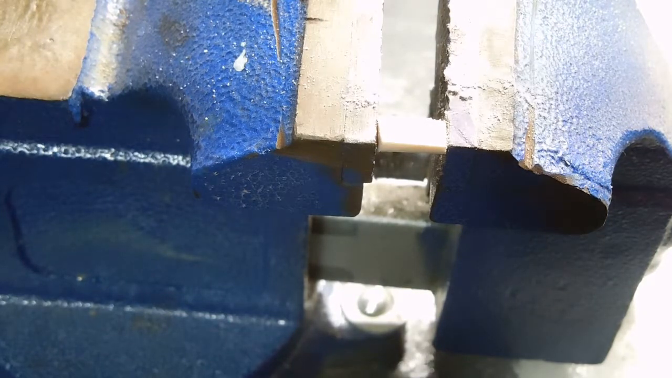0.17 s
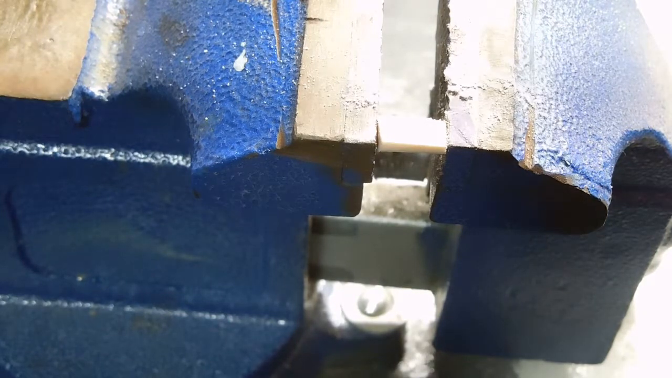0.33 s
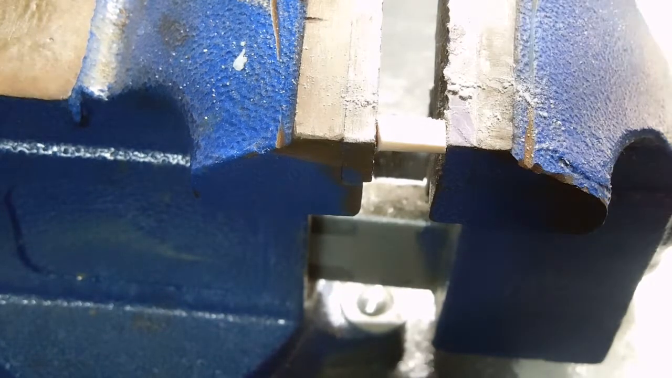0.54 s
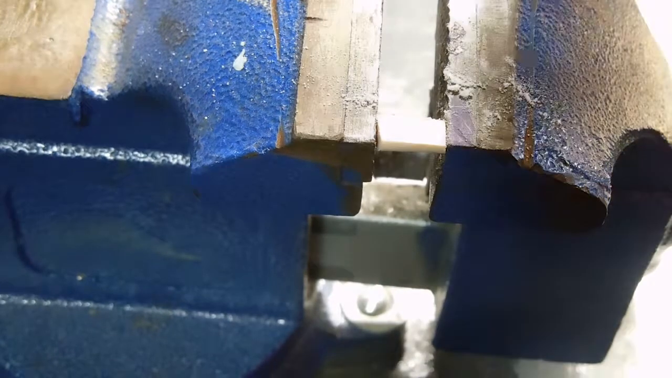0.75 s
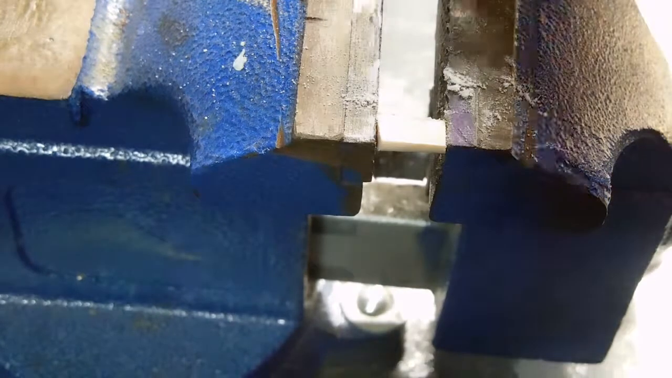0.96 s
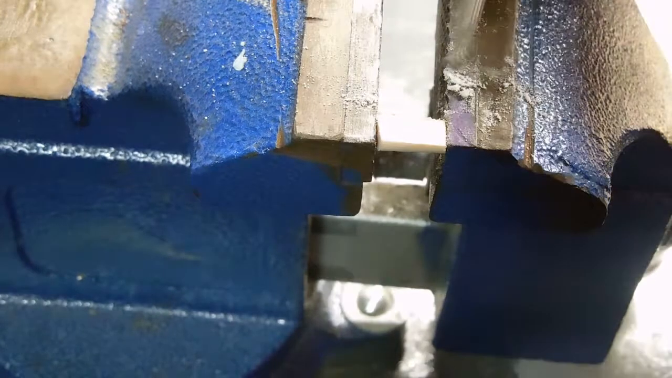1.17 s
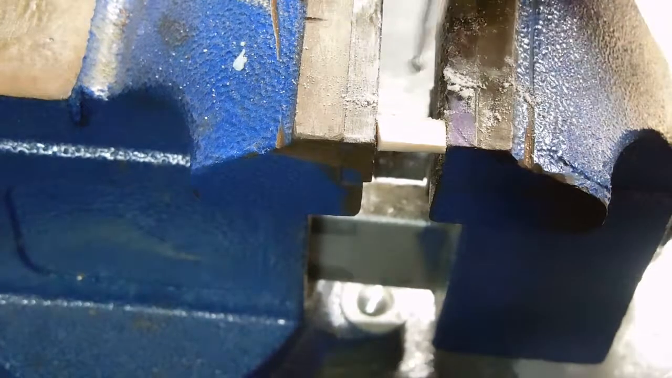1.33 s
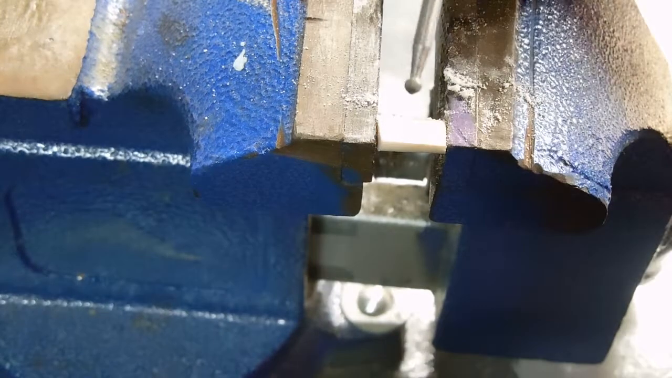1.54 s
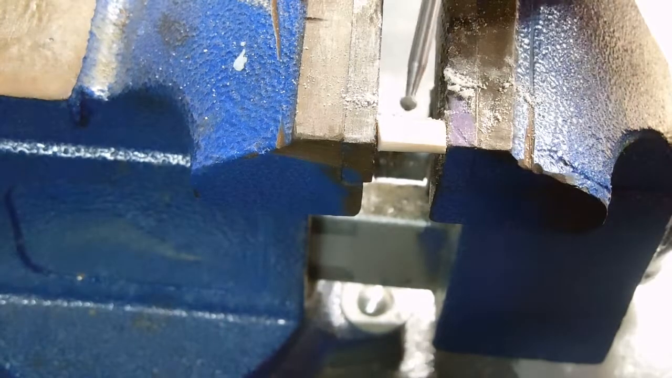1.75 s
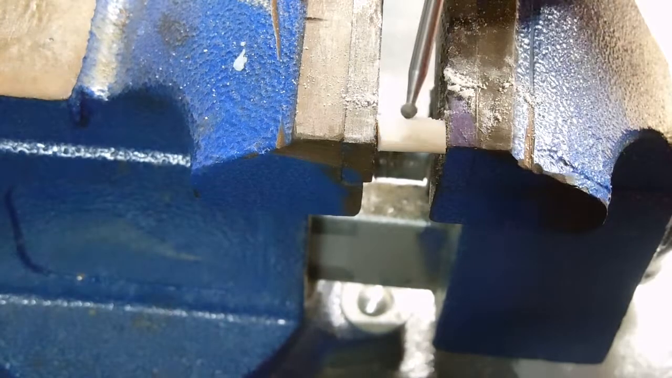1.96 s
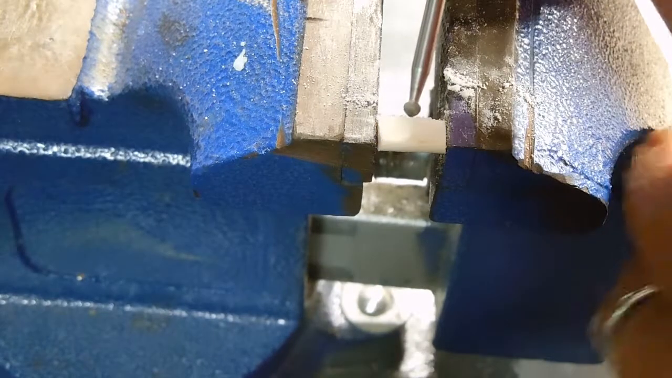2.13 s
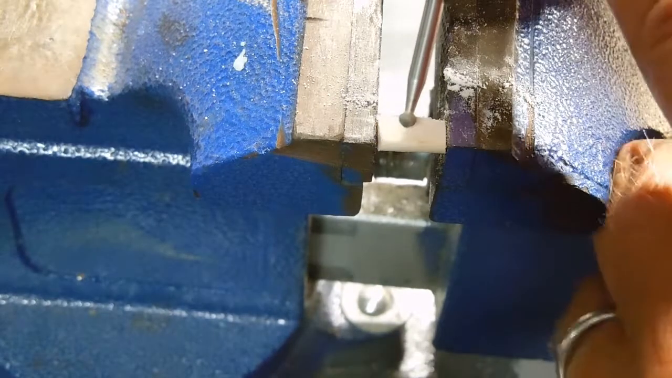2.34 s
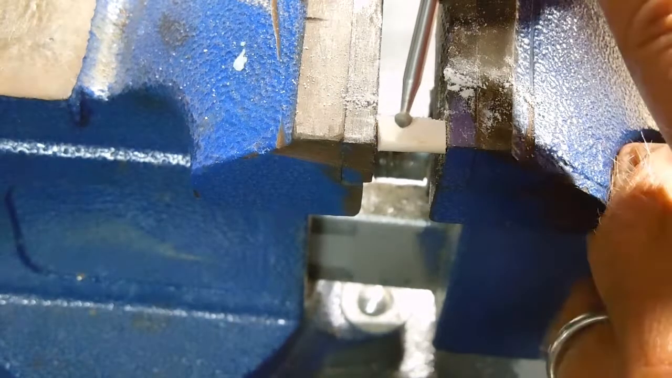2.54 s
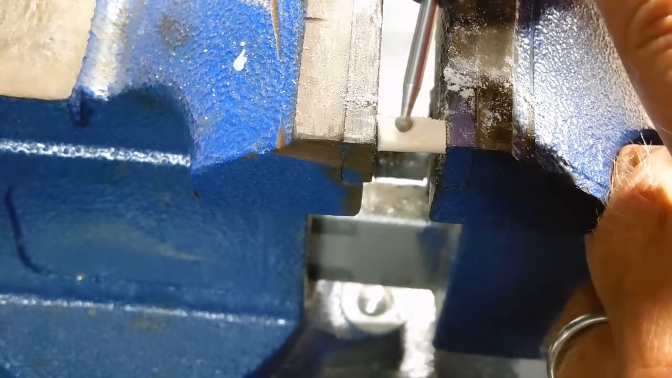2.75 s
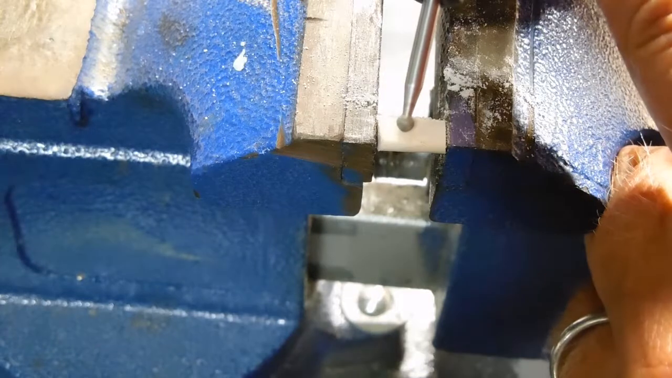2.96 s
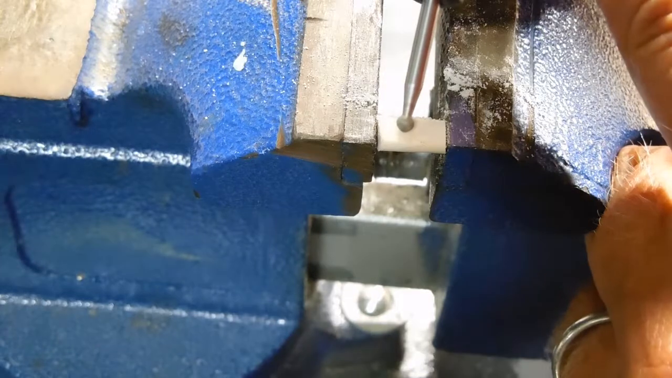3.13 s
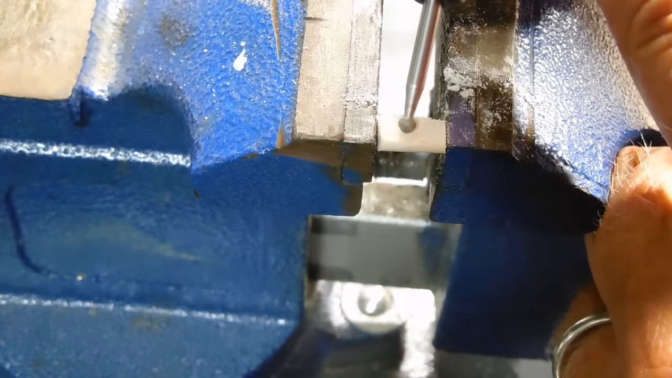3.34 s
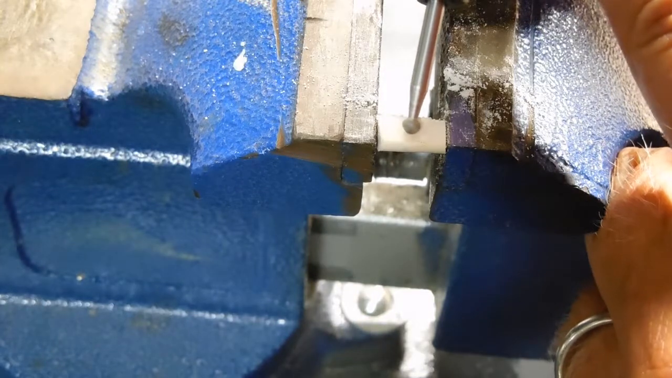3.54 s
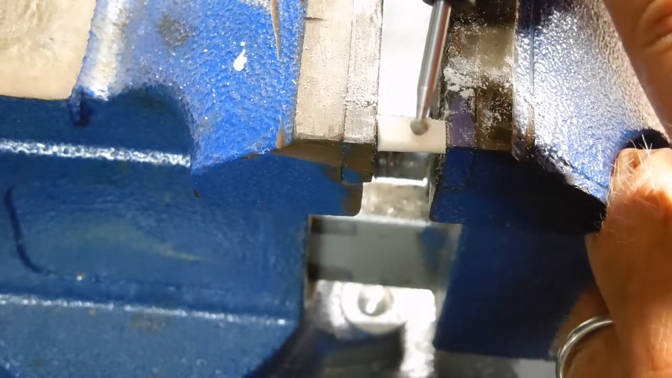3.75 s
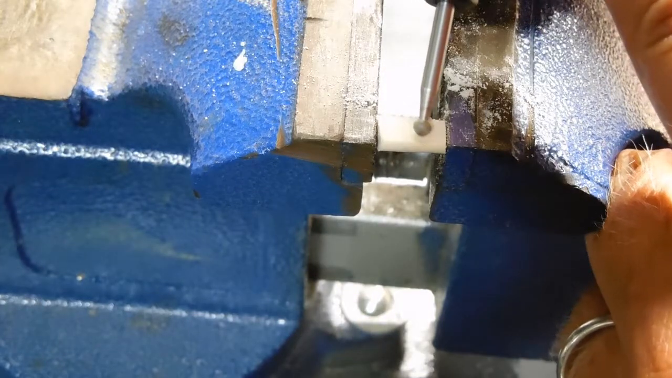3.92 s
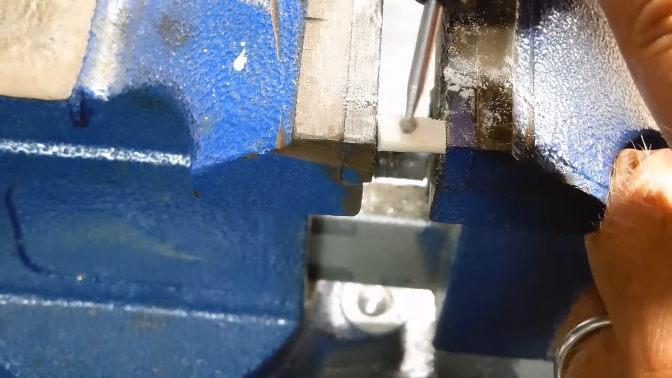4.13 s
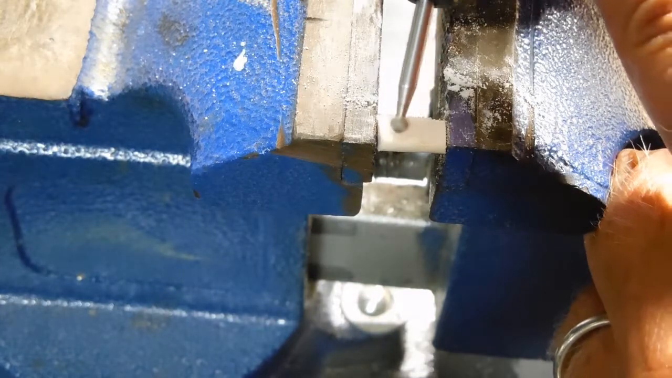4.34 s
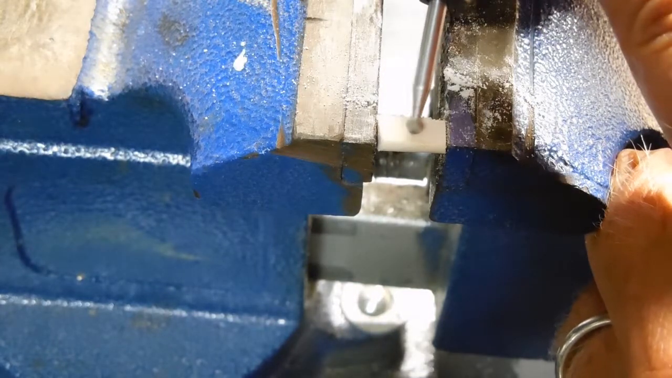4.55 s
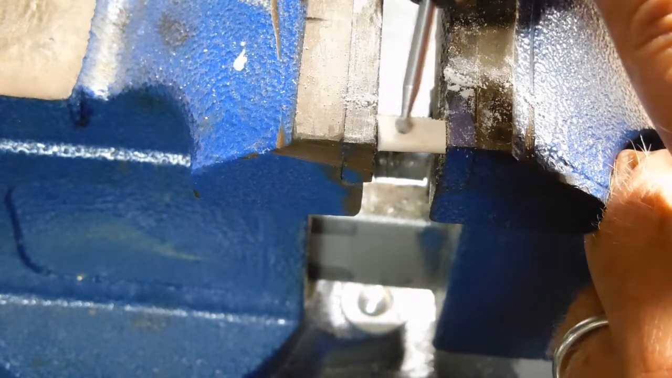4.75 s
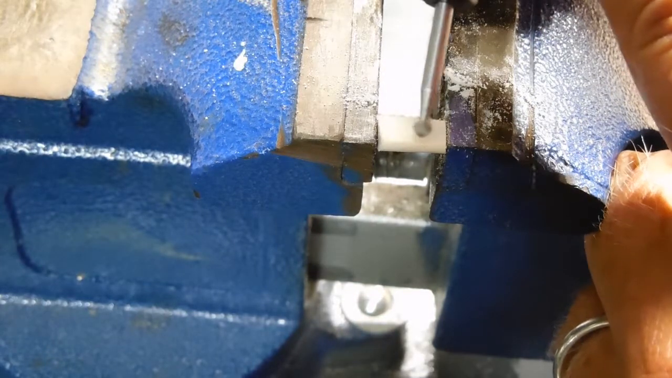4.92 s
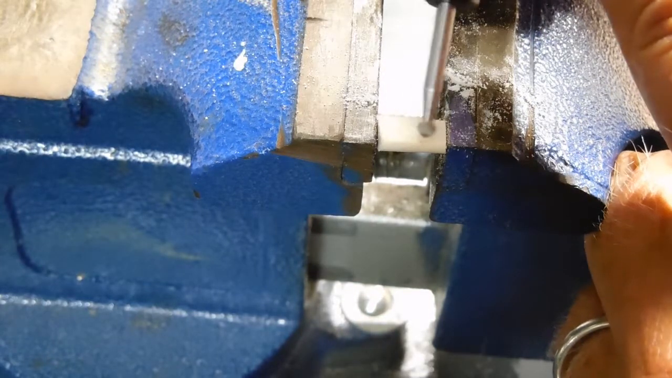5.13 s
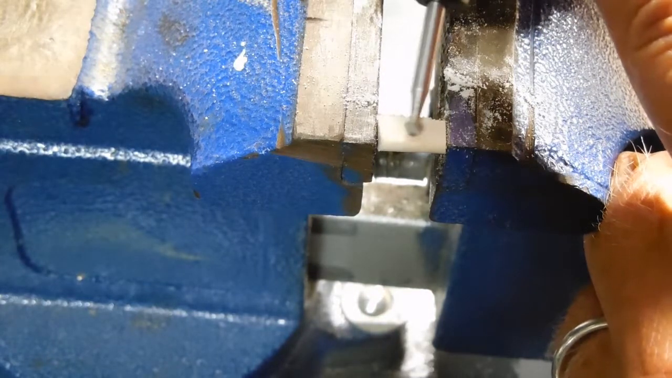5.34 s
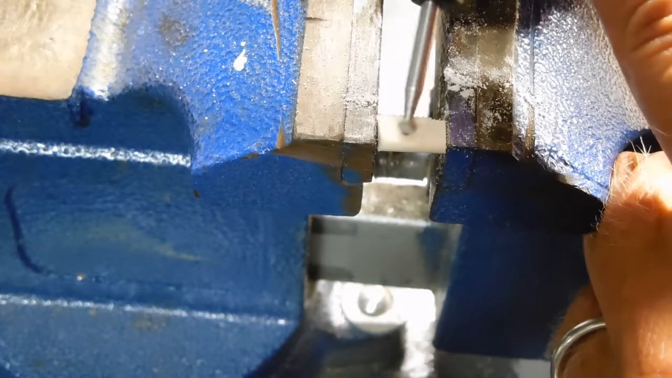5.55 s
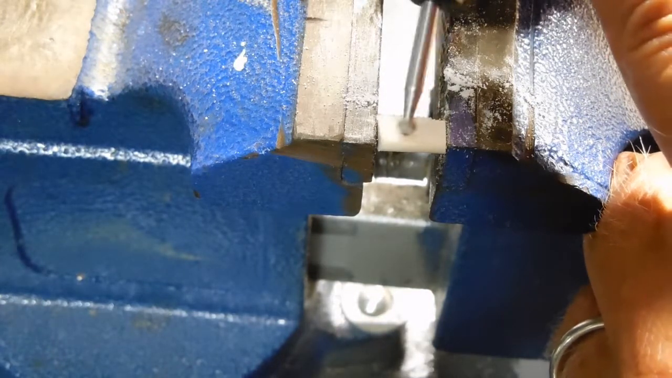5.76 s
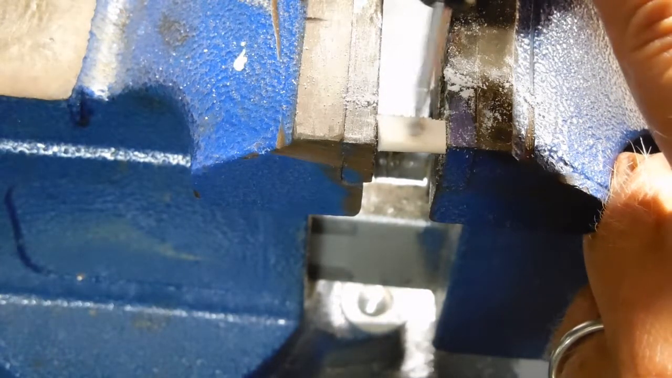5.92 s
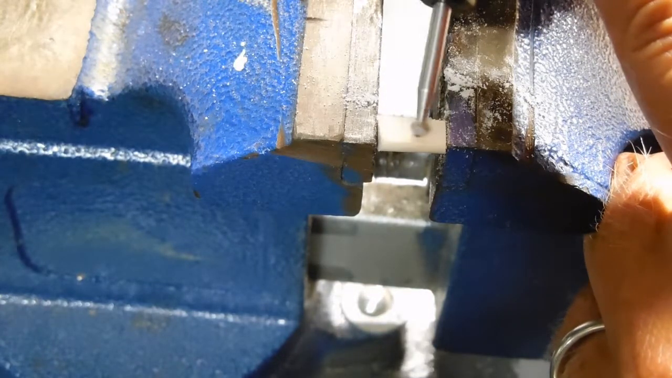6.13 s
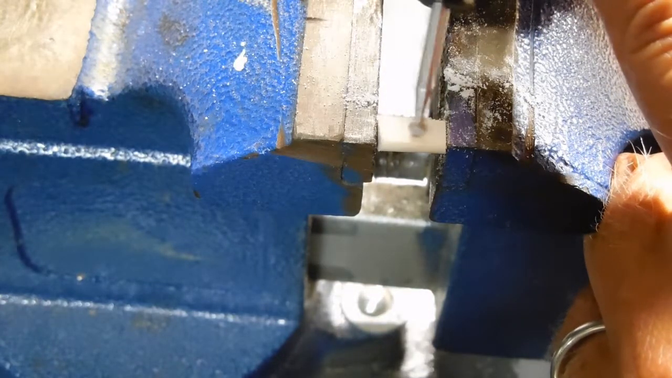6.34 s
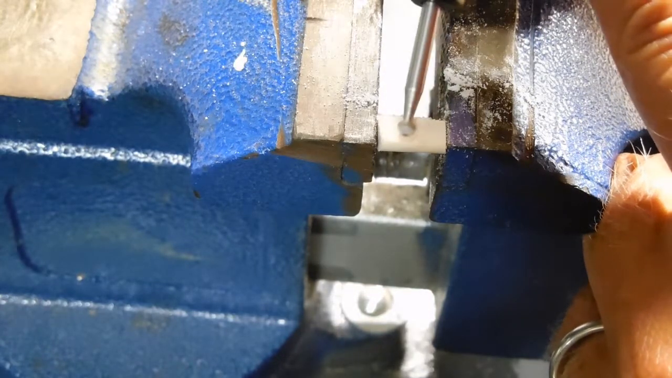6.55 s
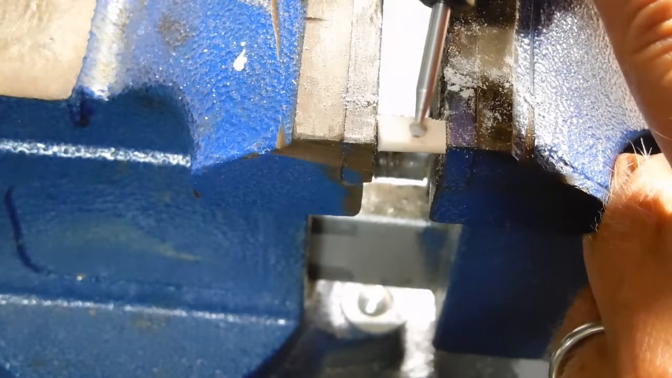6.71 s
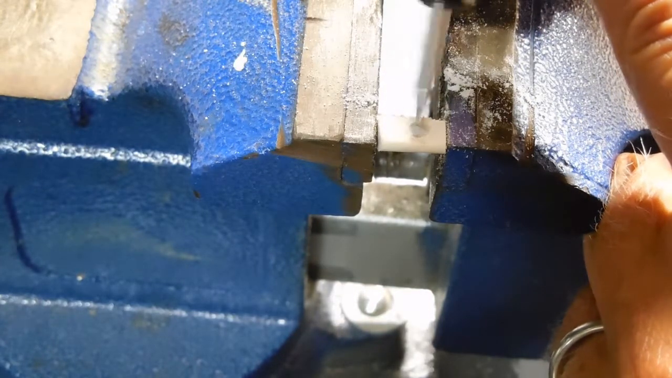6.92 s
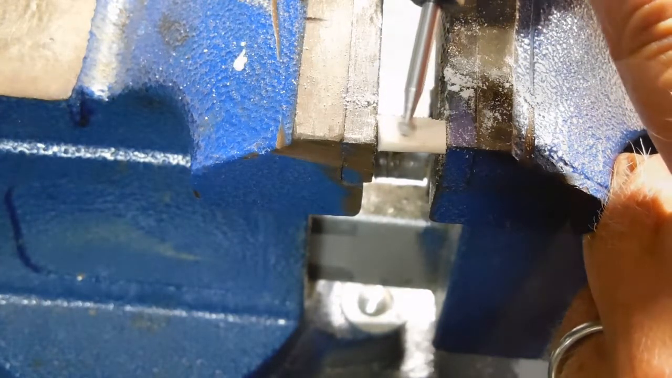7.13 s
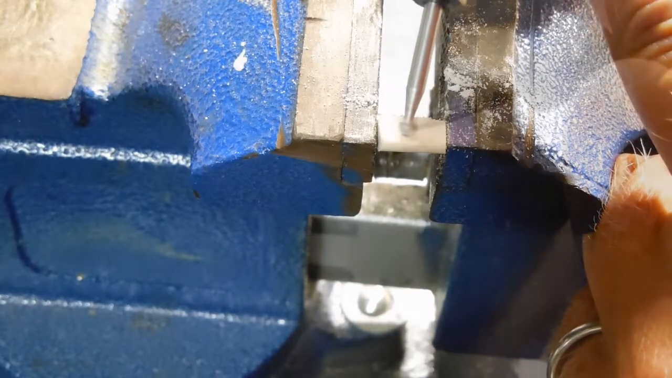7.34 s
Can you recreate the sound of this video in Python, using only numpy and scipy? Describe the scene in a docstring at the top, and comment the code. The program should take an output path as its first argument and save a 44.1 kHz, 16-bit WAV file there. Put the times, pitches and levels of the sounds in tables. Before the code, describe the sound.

Close up in a workshop, a small rotary tool is already turning and climbs in pitch, its airy hiss joined by a quick metallic rattle. A piercing motor whine settles, then the burr touches wood with a light dry buzz. The cut grows rougher and louder in uneven pushes, speed sagging slightly, thin high whistles wavering on top. It is still cutting at the end.

```python
"""Rotary burr carving wood

A handheld rotary tool spins up, then its burr carves a small block of wood held in a vise. Brushes crossing
commutator bars sing on multiples of 16 shaft orders, over turbulent hiss coloured by resonances of the housing.
The off-centre burr knocks the wood once a turn, scrapes in puffs and drags the speed down; a loose collet rattles
during spin-up and housing whistles join the cut. A low murmur and hums sink early, then flutter faintly until
the cut, which brings short bursts of faint low noise."""
import sys
import numpy as np
from scipy import signal
from scipy.io import wavfile
from scipy.ndimage import uniform_filter1d, minimum_filter1d

SR = 44100
rng = np.random.default_rng(int(sys.argv[2]) if len(sys.argv) > 2 else 0)


def master(y):
    """Save y as 16-bit WAV."""
    cut = np.clip(np.atleast_2d(y).T, -1, 1)
    pcm = np.round(cut * 32767)  # scale
    wavfile.write(sys.argv[1], SR, pcm.astype(np.int16))


N = 325458
T = np.arange(N) / SR  # seconds
HZ = np.fft.rfftfreq(1024, 1 / SR)  # bins of the noise spectra
FRAMES = np.arange(N // 256 + 5) * 256 / SR  # seconds
TOUCH_S, LANDING_S = 2.81, 0.08  # the burr meets the wood; time to land
SINK_S, SINK_TIME_S = 0.41, 0.15  # murmur and hums sink: start, duration


def gain_of(db):
    """Logarithmic level: decibels to an amplitude factor."""
    return np.exp(np.asarray(db, np.float32) * np.float32(np.log(10) / 20))


def evened(x):
    """Power normalisation: scales to rms 1."""
    return x / np.sqrt(np.mean(x ** 2) + 1e-20)


def columns(table, t):
    """Linear interpolation: the columns of a curve table at times t."""
    s, *rest = np.transpose(table)
    return [np.interp(t, s, c) for c in rest]


def on_hz(table, hz):
    """Logarithmic frequency: the columns of a spectrum table interpolated along it."""
    f, *rest = np.transpose(table)
    return [np.interp(np.log(hz + 1), np.log(f + 1), c) for c in rest]


def drift(hz):
    """Low-pass filtered noise: a random wander of rms 1, with changes up to hz."""
    points = rng.standard_normal(int(N / SR * 200) + 2)
    smooth = signal.lfilter(*signal.butter(2, min(hz / 100, .99)), points)
    return np.interp(T, np.arange(len(points)) / 200, evened(smooth))


# How the burr sits in the hollow. Each row: time in seconds, seat (0 tip touching, 1 flank cutting, 2 deep).
SEAT = [(2.78, 0), (4.12, 0), (4.18, 1), (5.76, 1), (5.86, 2), (7.38, 2)]


def by_seat(values):
    """Contact geometry: blends three values as the burr goes from tip to flank to deep."""
    s, seat = np.transpose(SEAT)
    return np.interp(T, s, np.take(values, seat.astype(int)))


def sinking(from_value, to_value):
    """Linear transition: a value that holds, then moves to another while the murmur and hums sink."""
    return from_value + (to_value - from_value) * np.clip((T - SINK_S) / SINK_TIME_S, 0, 1)


# Likeness of left and right. Each row: frequency in Hz, coherence (0 to 1), lead of the right side in radians.
PORTS = [(60, 0.93, .01), (150, 1, .01), (302, 0.96, .02), (1000, 0.69, 0.056), (2030, 0.72, 0.39),
         (2800, 0.71, 1), (3640, 0.97, 0.14), (4070, 0.37, 1), (5400, 0.55, 0.31), (6840, 0.1, 0.67),
         (6900, 0.26, 0.51), (8400, 0.89, 0.55), (9300, 0.35, 0.16), (13800, 0.34, .2)]
# Stereo balance of the hiss. Each row: frequency in Hz, left minus right in dB.
PAN = [(60, 1), (150, -2), (370, 1.5), (920, -2.5), (2290, -1.5), (5680, -2), (14100, 3)]


def hiss(field_db, patchy_db):
    """Partial coherence: stereo noise of rms 1, its bins x frames shaped by field_db, in drifting patches."""
    a, b, c, d, patches = rng.standard_normal((len(FRAMES), len(HZ), 5), dtype=np.float32).T
    patches = uniform_filter1d(patches, size=10, axis=0)
    patches = evened(uniform_filter1d(patches, size=12, axis=1))
    shape = gain_of(field_db + 0 * patches)
    shape = shape / np.sqrt((shape ** 2).mean(0))  # equal power in every frame before the patches
    shape = shape * gain_of(patchy_db * patches)
    coherence, lead = on_hz(PORTS, HZ)
    coherence = np.clip(coherence, 0, 1)[:, None]
    pan = gain_of(on_hz(PAN, HZ)[0] / 2)[:, None]
    left = a + 1j * b
    right = coherence * left + np.sqrt(1 - coherence ** 2) * (c + 1j * d)
    right = right * np.exp(1j * lead)[:, None]
    spectrum = np.array([left * pan, right / pan]) * shape
    return evened(signal.istft(spectrum, nperseg=1024, noverlap=768)[1][:, :N])


def line(angle, lead, pan_db):
    """Interaural phase and level: one tone of rms 1 before panning, the right side leading by lead radians."""
    wrapped = (angle - 2 * np.pi * np.rint(angle / (2 * np.pi))).astype(np.float32)
    left, right = np.cos(wrapped), np.cos(wrapped + np.float32(lead))
    return np.float32(np.sqrt(2)) * np.array([gain_of(pan_db / 2) * left, gain_of(-pan_db / 2) * right])


# Levels of the hums and murmur after they sink. Each row: time in seconds, level of the hums in dB,
# level of the murmur in dB; both before their flutter.
SUNK = [(0.6, -75, -86), (0.68, -64, -82), (1.03, -92, -96), (1.08, -71, -88), (1.26, -75, -90),
        (1.29, -95, -107), (1.51, -66, -86), (1.63, -100, -110), (1.81, -88, -91), (1.86, -96, -110),
        (1.9, -83, -83), (2.11, -102, -110), (2.24, -72, -109), (2.27, -70, -89), (2.66, -76, -92),
        (2.8, -74, -110)]
# Hums of the workshop. Each row: centre in Hz, half-power width in Hz, relative power density in dB.
ROOM_HUMS = [(330, 190, -16), (583.3, 32.4, 7), (646, 27, -23), (746, 45, -7), (980, 240, -6.5),
             (1130, 280, -5.5)]
ROOM_DB = -51  # before sinking


def room():
    """Narrow-band noise: fuzzy workshop hums that sink early, then flutter faintly."""
    power = sum(gain_of(2 * db) / (1 + ((HZ - hz) / (width / 2)) ** 4) for hz, width, db in ROOM_HUMS)
    flutter_db = sinking(2, 4) * np.tanh(drift(6))
    level_db = sinking(ROOM_DB, columns(SUNK, T)[0])
    fade = np.clip((TOUCH_S - T) / LANDING_S, 0, 1)  # the hums fade out as the burr lands
    hums = hiss(10 * np.log10(power)[:, None], patchy_db=-1.0)
    return fade * gain_of(level_db + flutter_db) * hums


# Colour of the low noise. Each row: frequency in Hz, relative level in dB per Hz.
RUMBLE_COLOUR = [(20, -44), (60, 9.5), (150, -18), (250, -1), (400, -1.5), (520, 5), (700, -25)]
# Short bursts of faint low noise during the cut. Each row: start in seconds, length in seconds, level in dB.
LOW_BURSTS = [(3.28, 0.13, -76), (3.458, 0.056, -73), (3.63, 0.081, -68), (4.271, 0.04, -80),
              (4.383, 0.14, -71), (4.615, 0.066, -76), (4.716, 0.053, -77), (4.804, 0.081, -69),
              (5.018, 0.073, -72), (5.292, 0.063, -69), (5.375, 0.15, -72), (5.676, 0.246, -67),
              (6.092, 0.2, -61.5), (6.284, 0.16, -63), (6.42, 0.1, -68), (6.55, 0.1, -64),
              (6.797, 0.05, -70), (6.895, 0.061, -66), (7.008, 0.093, -63.5), (7.108, 0.06, -60),
              (7.23, 0.07, -65), (7.323, 0.06, -69)]
MURMUR_DB = -61.5  # before sinking
BURST_EDGE_S, LOW_FLOOR_DB = 0.01, (-86, -79, -75)  # low noise between bursts: tip, flank, deep


def rumble():
    """Amplitude-modulated low noise: a murmur that sinks and flutters, then low bursts."""
    sunk = np.clip((T - SINK_S) / SINK_TIME_S, 0, 1)
    level = gain_of(sinking(MURMUR_DB, columns(SUNK, T)[1]) + 5 * sunk * np.tanh(drift(2.9)))
    low_floor = gain_of(by_seat(LOW_FLOOR_DB) + 2.9 * np.tanh(drift(11.0)))
    level = level + np.clip((T - TOUCH_S) / 0.36, 0, 1) * low_floor
    for s, length, db in LOW_BURSTS:
        corners_s = s + np.array([-BURST_EDGE_S, 0, length - BURST_EDGE_S, length])
        level = level + np.interp(T, corners_s, gain_of(db) * np.array([0, 1, 1, 0]))
    lumps = gain_of(sinking(1.5, 3.5) * drift(7.3))
    low_noise = hiss(on_hz(RUMBLE_COLOUR, HZ)[0][:, None], patchy_db=4.5)
    return level * evened(lumps * low_noise)


# The loose collet rattles as the shaft passes through its resonance.
# Each row: start in seconds, level in dB before a common trim, pitch in Hz.
RATTLES = [(0.3117, -22, 3760), (0.3242, -19, 4530), (0.3284, -23, 3800), (0.3465, -23, 3780),
           (0.3634, -20, 4660), (0.377, -16.5, 3850), (0.3894, -23, 3670), (0.4154, -26, 4050),
           (0.4325, -22, 3900), (0.4444, -30, 4000), (0.4707, -22, 3940), (0.4804, -20, 3820),
           (0.487, -26, 3740), (0.4994, -26, 4200), (0.5144, -21, 3860), (0.5521, -22, 4160),
           (0.561, -21, 5400), (0.5846, -24, 5170)]
RATTLE_RISE_S, RATTLE_T60_S, RATTLE_TRIM_DB = .0008, 0.005, -4.5


def rattle():
    """Damped free vibration: short ticks ringing in the nose of the tool."""
    out, t = np.zeros((2, N)), np.arange(1500) / SR
    decay = gain_of(-60 * np.maximum(t - RATTLE_RISE_S, 0) / RATTLE_T60_S)
    shape = np.minimum(t / RATTLE_RISE_S, 1) * decay
    phases = rng.uniform(0, 2 * np.pi, len(RATTLES))
    for (s, db, hz), phase in zip(RATTLES, phases):
        at = round(s * SR)
        ring = line(2 * np.pi * hz * t + phase, 0.41, -1.2)
        out[:, at:at + len(t)] += gain_of(db + RATTLE_TRIM_DB) * shape * ring
    return out


# Two narrow resonances of the housing whistle as the cut deepens. Each row: time in seconds,
# level of the lower in dB, level of the upper in dB; both before their share and the seat of the burr.
WHISTLES = [(4.0, -44, -39), (4.03, -49, -37), (4.18, -42, -35), (4.24, -44, -41), (4.31, -31, -37),
            (4.34, -47, -37), (4.39, -43, -42), (4.44, -56, -37), (4.5, -43, -36), (4.7, -47, -37),
            (4.72, -44, -42), (4.82, -39, -39), (5.19, -45, -34), (5.35, -34, -26), (5.95, -45, -32),
            (6.25, -45, -25), (6.3, -55, -34), (6.36, -35, -33), (6.51, -41, -42), (6.57, -37, -28),
            (6.69, -36, -22), (6.77, -48, -30), (6.81, -41, -46), (6.88, -46, -31), (7.11, -39, -27),
            (7.38, -44, -27)]
WHISTLE_HZ, WHISTLE_WAVER_HZ, WHISTLE_SHARE_DB = (6120, 8470), (39.8, 70.6), (0.5, -4.5)  # lower, upper


def whistles():
    """Random frequency modulation: fuzzy, wavering tones that come up once the flank cuts."""
    out = np.zeros((2, N))
    levels_db = columns(WHISTLES, T)
    for hz, waver_hz, share_db, db in zip(WHISTLE_HZ, WHISTLE_WAVER_HZ, WHISTLE_SHARE_DB, levels_db):
        pitch_hz = hz + waver_hz * (drift(12) + .6 * drift(90))
        turn = 2 * np.pi * np.cumsum(pitch_hz) / SR
        out += gain_of(db + share_db + 2.3 * drift(60)) * line(turn, on_hz(PORTS, hz)[1], -0.6)
    return columns(SEAT, T)[0] / 2 * out


# The shaft spins up, then sags as the cut deepens. Each row: time in seconds, mean shaft speed in Hz.
SPEED = [(0.0, 105.06), (0.12, 111.6), (0.225, 117.8), (0.3, 121.8), (0.4, 126.7), (0.475, 129.7),
         (0.6, 134.19), (0.85, 140.86), (1.1, 145.81), (1.35, 149.44), (1.475, 150.4), (1.725, 151.4),
         (1.85, 152.5), (2.1, 154.1), (2.85, 155.35), (3.35, 154.5), (3.6, 155.0), (3.975, 154.2),
         (4.2, 154.1), (4.475, 153.55), (4.85, 152.3), (5.1, 150.6), (5.35, 151.05), (5.6, 151.05),
         (5.85, 150.3), (6.1, 148.62), (6.35, 147.6), (6.79, 147.0), (6.975, 146.2), (7.38, 147.3)]
# Whirr of fan and brushes. Each row: time in seconds, level in dB before flicker and throb,
# lift of the hiss below about 4400 Hz in dB.
WHIRR = [(0, -33, 4), (.2, -32.5, 4.5), (.33, -29.5, 5), (.7, -30.5, 2), (.78, -27.5, -1),
         (1.13, -27.5, 0.5), (1.52, -25.5, -1.5), (1.66, -26.5, 0), (1.8, -25, -1.5), (2.3, -27.5, 1),
         (3.0, -26.5, 1), (4.05, -26.5, 3.5), (4.3, -25.5, 3.5), (5.3, -25.5, 3), (6.05, -25, 2.5),
         (6.65, -25, -0.5), (6.9, -24.5, 3.5), (7.2, -23.5, -2), (7.38, -23.5, 2)]
# Colour of the whirr under its humps. Each row: frequency in Hz, relative level in dB per Hz.
WHIRR_BASE = [(300, -59), (600, -48.5), (950, -30), (1150, -21), (1500, -12.5), (2500, -6.5), (5500, -6),
              (7500, 0), (9500, -1.5), (10300, -8), (12200, -18.5), (12600, -41), (13300, -20),
              (13800, -45), (14500, -40)]
# Humps at full speed. Each row: centre in Hz, width in Hz, height in dB running free, height in dB cutting deep.
HUMPS = [(2390, 450, 3.5, 8), (3480, 710, 5, 6), (4720, 1100, 4, 5.5), (6185, 320, 6, 7.5),
         (7550, 600, 2.5, 7.5), (8530, 480, 7.5, 11.5), (9950, 600, 3.5, 5.5), (11080, 370, 2, 7),
         (12130, 400, 3, 6)]
# Bands swell or sink as the tool is turned in the hand. Each row: centre in seconds, length in seconds,
# centre in Hz, width in Hz, height in dB.
SWELLS = [(0.62, 0.3, 4100, 750, 2), (0.29, 0.84, 4820, 1300, 5), (0.58, 0.14, 5800, 2000, 7),
          (0.7, 0.73, 3150, 1230, -5.5), (0.87, 0.34, 5400, 690, 6), (0.99, 0.5, 1650, 890, 6.5),
          (0.39, 0.5, 3800, 300, 7.5), (1.16, 0.23, 7400, 1000, 5.5), (1.26, 0.3, 3500, 350, 7),
          (0.2, .2, 4550, 120, 10), (.3, 0.18, 2800, 140, 12)]
HUMP_SPEED_HZ = 155.8  # shaft speed at which the humps have climbed into place


def whirr(angle):
    """Resonance-coloured turbulence: air and brush hiss throbbing twice a turn, and once a turn under load."""
    level_db = columns(WHIRR, T)[0]
    low_db = columns(WHIRR, FRAMES)[1] + 0.49 * np.interp(FRAMES, T, drift(6.5))
    top_speed = np.maximum.accumulate(columns(SPEED, FRAMES)[0])  # humps climb and never fall back
    shift = np.minimum(top_speed / HUMP_SPEED_HZ, 1)
    depth = columns(SEAT, FRAMES)[0] / 2
    field = on_hz(WHIRR_BASE, HZ)[0][:, None] + 0 * FRAMES
    for hz, width, free_db, deep_db in HUMPS:
        bell = np.exp(-2.8 * ((HZ[:, None] - hz * shift) / width) ** 2)
        field = field + bell * (free_db + depth * (deep_db - free_db))
    for s, length, hz, width, db in SWELLS:
        distance = ((HZ[:, None] - hz) / width) ** 2 + ((FRAMES - s) / length) ** 2
        field = field + db * np.exp(-2.8 * distance)
    upper = 1 / (1 + (4400 / (HZ[:, None] + 1)) ** 12)
    patchy_db = 1.21 + 4 / (1 + (HZ[:, None] / 1100) ** 6)  # the faint bottom of the hiss flickers more
    throb = 1 + 0.12 * np.cos(2 * angle) + 0.067 * columns(SEAT, T)[0] * np.cos(angle + 1.0)
    sound = hiss(field + (1 - upper) * low_db, patchy_db)
    return gain_of(level_db + 0.74 * drift(19.3)) * throb * sound


# Strong commutator lines. Each row: time in seconds, then the rms level in dB of shaft orders 16, 32, 48, 64
# before flicker and panning.
TONES = [(0, -70, -60, -58, -59), (.1, -66, -66, -58, -43), (.17, -62, -54, -56, -33),
         (.225, -55, -69, -58, -33), (.3, -58, -51, -58, -35), (.36, -54, -50, -43, -41),
         (.43, -60, -50, -43, -37), (.53, -60, -51, -52, -46), (.57, -56, -51, -51, -45),
         (.61, -45, -51, -44, -39), (.66, -44, -50, -46, -44), (.72, -46, -50, -46, -49),
         (.77, -54, -47, -37, -46), (.82, -57, -46, -36, -44), (.92, -55, -45, -39, -41),
         (1.03, -46, -48, -37, -50), (1.08, -46, -48, -41, -48), (1.17, -48, -48, -33, -52),
         (1.27, -58, -47, -40, -48), (1.38, -40, -42, -29.5, -52), (1.52, -53, -41, -30, -42),
         (1.58, -39.5, -36.5, -32, -55), (1.76, -38.5, -45, -33, -55), (1.82, -39, -43, -25.5, -47),
         (2.0, -36, -42, -26.5, -42), (2.1, -40, -37.5, -23, -45), (2.25, -44.5, -37, -25, -43),
         (2.4, -36, -40, -25.5, -47), (2.55, -40, -42, -25, -48), (2.8, -39.5, -41.5, -26.5, -55),
         (3.7, -38, -41.5, -26.5, -48), (4.0, -34.5, -40.5, -27, -44), (4.15, -39, -41, -25.5, -46),
         (4.28, -36.5, -42, -25.5, -41), (4.36, -33.5, -42, -25.5, -41), (4.54, -29, -42, -29.5, -50),
         (4.75, -34.5, -51, -29, -56), (4.9, -36, -41, -29, -56), (5.0, -36, -41, -32, -60),
         (5.12, -33.5, -43, -26.5, -58), (5.18, -43, -46, -30.5, -55), (5.33, -31, -40, -28, -60),
         (5.45, -49, -49, -31, -62), (5.52, -35, -40, -27.5, -60), (5.7, -40, -44, -29, -63),
         (5.85, -48, -41, -27, -60), (5.95, -32, -43, -33, -60), (5.98, -33, -52, -46, -60),
         (6.08, -39, -49, -44, -57), (6.11, -41, -49, -29, -57), (6.17, -40, -46, -40, -58),
         (6.22, -47, -51, -37, -59), (6.5, -47.5, -47, -36, -61), (7.38, -45, -52, -32, -52)]
# How a tone reaches the two sides. Each row: frequency in Hz, lead of the right side in radians,
# left minus right in dB.
TONE_PORTS = [(1500, .3, -2), (2450, .5, -.8), (4900, 1.05, -4), (7200, 1.85, -1.5), (7500, 1.85, -1.5),
              (7900, 1.3, -.7), (8600, 1.5, -.7), (9800, 2.8, 6), (12500, 2.1, 2.5)]
# Weaker lines riding on a strong one. Each entry: level in dB relative to the strong line's half-second mean.
SIDELINES = [-24, -14, -15.5, -1.5, -23]
BARS, FLUTTER_DB = (16, 32, 48, 64), (1.5, 1.7, 1.2, 1.5)  # strong orders, their flicker running free
SIDE_ORDERS, SIDE_OF = (50, 52, 56, 66, 40), (2, 2, 2, 3, 1)  # weaker orders, index of the strong line followed
SIDE_FLUTTER_DB = 2.2
DRONE_S, DRONE_LENGTH_S, DRONE_DB = 0.32, 0.11, -60.5  # a low tone at two and a half times the shaft speed


def commutator(angle):
    """Order harmonics: brushes cross 16 bars a turn; the uneven field adds weaker even orders."""
    speed, levels_db = columns(SPEED, T)[0], columns(TONES, T)
    # the tones are broken while spinning up and deep in the cut
    loaded_db = by_seat((0, -.5, 1.8)) + np.interp(speed, [135, 152], [1, 0])
    out = np.zeros((2, N))
    for order, db, flutter_db in zip(BARS, levels_db, FLUTTER_DB):
        ports = on_hz(TONE_PORTS, order * speed)
        flicker_db = (flutter_db + loaded_db) * drift(15.2)
        out += gain_of(db + flicker_db) * line(order * angle + 0.33 * drift(25), *ports)
    for order, strong, db in zip(SIDE_ORDERS, SIDE_OF, SIDELINES):
        mean_db = uniform_filter1d(levels_db[strong], size=SR // 2)
        ports = on_hz(TONE_PORTS, order * speed.max())
        flicker_db = SIDE_FLUTTER_DB * drift(8.6)
        out += gain_of(mean_db + db + flicker_db) * line(order * angle + drift(9.2), *ports)
    swell = np.exp(-((T - DRONE_S) / DRONE_LENGTH_S) ** 2)
    drone = line(5 * angle / 2 + drift(4.6), 0, 0)
    return out + swell * gain_of(DRONE_DB + 1.4 * drift(13)) * drone


# How hard the hand presses the burr in. Each row: time in seconds, level of the cut in dB before the shares below.
PRESSURE = [(2.88, -49.5), (2.89, -49.5), (3.26, -41.5), (4.07, -45), (4.13, -44), (4.18, -35.5),
            (4.3, -41.5), (4.63, -35.5), (4.72, -41.5), (4.76, -33), (4.83, -41), (4.91, -34.5),
            (5.14, -37.5), (5.2, -33.5), (5.34, -36), (5.8, -33), (5.82, -36.5), (6.04, -32), (6.06, -39),
            (6.11, -31.5), (6.21, -31.5), (6.25, -34), (6.3, -30), (6.33, -36.5), (6.41, -30.5),
            (6.65, -36), (6.69, -31), (6.79, -36), (6.84, -30.5), (6.87, -36), (7.05, -29.5), (7.1, -33.5),
            (7.15, -31), (7.2, -35), (7.28, -30.5), (7.3, -36), (7.34, -29.5), (7.38, -34)]
# Spectrum of the knock, one row for each of KNOCK_ORDERS. Each row: relative level in dB with the tip,
# with the flank, deep.
KNOCK = [(-48, -25, -35), (-48, -46, -20), (-10, -9.5, -1), (-39, -6, -3.5), (-41, 5, 2), (-8, 7, 8.5),
         (0.5, 4.5, -43), (-4, -6, -8), (-4, 3.5, -5.5), (0, 8.5, 1.5), (-7, 0, -9), (-1, -2, -5),
         (-0.5, 7, -2.5), (-3, 1, 0.5), (-14, -14, -20), (-5, -2, -23), (-15, -6.5, -5), (-20, -5, -4),
         (-7, -3, -2), (-6, 10.5, 4.5), (-16, 9.5, 6), (-26, 2, 1.5), (-22, -10, -6)]
# The shank rings near 3.5 kHz at each knock. Each row: time in seconds, level in dB that replaces
# the level of the cut for the high orders.
RINGING = [(2.88, -30.5), (2.9, -39), (3.83, -31.5), (3.84, -48), (3.99, -26), (4.02, -35), (4.23, -35),
           (4.85, -41.5), (5.3, -36), (5.39, -48), (5.41, -38.5), (5.79, -33), (5.82, -39), (5.95, -28.5),
           (6.04, -31), (6.06, -42), (6.16, -29), (6.36, -38), (6.4, -29.5), (6.58, -34), (6.63, -42),
           (6.65, -33), (6.89, -38), (7.07, -26.5), (7.08, -36), (7.17, -31), (7.19, -58), (7.24, -35.5),
           (7.37, -33), (7.38, -27)]
# The burr swings round the hollow, so its knock runs fast and slow. Each row: time in seconds,
# rounds so far, swing of the knock rate in Hz.
WHIRL = [(2.9, 0.69, 0.41), (3.05, 3.25, 0.65), (3.2, 5.41, 0.28), (3.35, 7.38, 0.23), (3.5, 9.35, 0.45),
         (3.65, 11.48, 0.46), (3.8, 13.7, 0.24), (3.95, 15.93, 0.45), (4.1, 17.45, 0.07),
         (4.25, 19.59, 0.4), (4.4, 21.79, 0.96), (4.55, 23.77, 0.78), (4.7, 25.71, 1.03),
         (4.85, 27.71, 1.23), (5.0, 29.86, 0.77), (5.15, 31.77, 0.62), (5.3, 33.41, 0.6),
         (5.45, 35.43, 0.45), (5.6, 37.16, 0.12), (5.75, 38.87, 0.42), (5.9, 40.8, 0.94),
         (6.05, 42.89, 0.86), (6.2, 45.08, 0.27), (6.35, 47.3, 1.08), (6.5, 49.09, 0.66),
         (6.65, 51.07, 1.31), (6.8, 53.12, 2.33), (6.95, 55.2, 1.97), (7.1, 57.21, 0.96),
         (7.25, 59.08, 0.09), (7.3, 60.06, 1.1)]
# Colour of the scrape. Each row: frequency in Hz, relative level in dB per Hz.
SCRAPE = [(250, -84), (450, -22.5), (700, -2.5), (1000, 5), (1400, 9.5), (2000, 5), (2450, 6.5),
          (2900, -13), (3500, -15.5), (4100, -8), (6000, -35)]
KNOCK_ORDERS = (*range(3, 16), *range(17, 27))
RINGING_FROM = 21  # lowest shaft order carried by the shank
WHIRL_PER_S, WHIRL_DB_PER_HZ, WHIRL_LEAD_RAD = 13.5, 1.1, 2.0  # the force swings too, a little ahead
# three values each, for tip, flank, deep
KNOCK_SHARE_DB, SCRAPE_SHARE_DB = (-3, -12, -10.5), (2, -4, -8.5)  # relative to the level of the cut
JUDDER_RAD = (.03, .015, .025)  # quick slip as the burr catches the grain
WAVER_RAD = (.015, .02, .04)  # slow slip as the hand shifts
UNEVEN_DB = (2.2, 1.5, 1.8)  # wander of each order of the knock
FITFUL_DB = 1.3  # how unevenly the chips tear, at every seat


def burr(angle):
    """Periodic impact and friction: the off-centre burr knocks once a turn, never quite alike, and scrapes."""
    cut_db, touching = columns(PRESSURE, T)[0], np.clip((T - TOUCH_S) / LANDING_S, 0, 1)
    rounds, swing_hz = columns(WHIRL, T)
    # the knock comes early or late, in radians of a turn
    slip = swing_hz / WHIRL_PER_S * np.sin(2 * np.pi * rounds) + .008 * drift(70)
    slip = slip + by_seat(JUDDER_RAD) * drift(16) + by_seat(WAVER_RAD) * drift(7)
    # its force, shared by all orders
    strength_db = WHIRL_DB_PER_HZ * swing_hz * np.cos(2 * np.pi * rounds + WHIRL_LEAD_RAD)
    strength_db = strength_db + .8 * drift(14) + drift(80)
    knock, ringing_db = np.zeros((2, N)), columns(RINGING, T)[0]
    for order, seat_db in zip(KNOCK_ORDERS, KNOCK):
        db = by_seat(seat_db) + by_seat(UNEVEN_DB) * drift(10.0)
        db = db + (ringing_db - cut_db) * (order >= RINGING_FROM)
        lead = on_hz(PORTS, order * 159.0)[1]
        # the orders arrive nearly together: a dry knock, a sharper ping
        spread = .1 if order < RINGING_FROM else .03
        phase = spread * order ** 2 + .35 * drift(3)
        knock += gain_of(db) * line(order * (angle + slip) + phase, lead, -0.37)
    # chips tear off just after each knock
    puffs = evened(np.exp(by_seat((.4, .7, 1.1)) * np.cos(angle + slip - .5)))
    scrape = puffs * hiss(on_hz(SCRAPE, HZ)[0][:, None], patchy_db=1.5)
    knocking = gain_of(by_seat(KNOCK_SHARE_DB) + strength_db) * knock
    scraping = gain_of(by_seat(SCRAPE_SHARE_DB) + FITFUL_DB * drift(15)) * scrape
    return touching * gain_of(cut_db) * (knocking + scraping)


# The speed control hunts: swing of the shaft speed in Hz, starting phase in radians.
HUNT_HZ, HUNT_START_RAD = .24, -3.76
# Each row: time in seconds, swings a second.
HUNT_RATES = [(0, 8.64), (2.85, 8.64), (2.95, 8.42), (7.38, 8.42)]


def scene():
    """Superposition: room, motor and burr add, the rotating sources locked to one shaft angle."""
    hunt = np.cos(2 * np.pi * np.cumsum(columns(HUNT_RATES, T)[0]) / SR + HUNT_START_RAD)
    angle = 2 * np.pi * np.cumsum(columns(SPEED, T)[0] + HUNT_HZ * hunt) / SR
    background = room() + rumble()
    tool = rattle() + whistles() + whirr(angle) + commutator(angle)
    return background + tool + burr(angle)


EDGE_HZ = 14713


def record(dry):
    """Peak limiting and band limiting: a quick limiter holds the highest peaks down, then a low-pass."""
    headroom = np.minimum(.29 / (abs(dry).max(0) + 1e-9), 1)
    held = dry * uniform_filter1d(minimum_filter1d(headroom, size=129), size=129)
    low_pass = signal.firwin(511, EDGE_HZ, window=("kaiser", 9), fs=SR)
    return signal.oaconvolve(held, low_pass[None], "same")


dry = scene()
out = record(dry)
master(out)
```